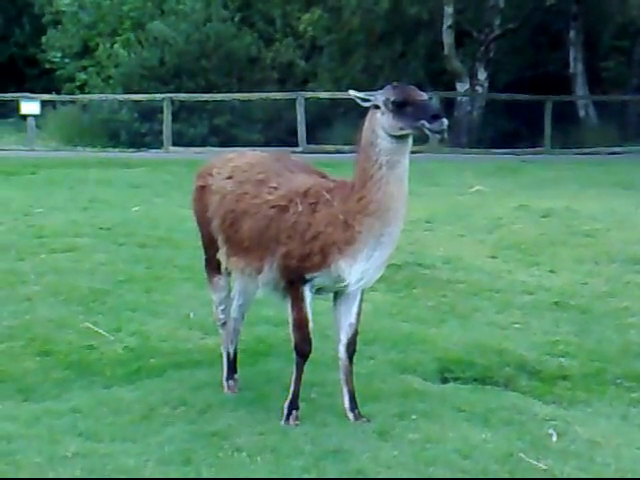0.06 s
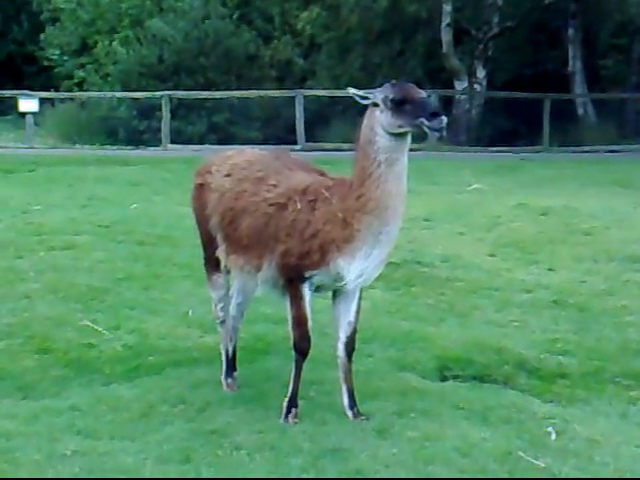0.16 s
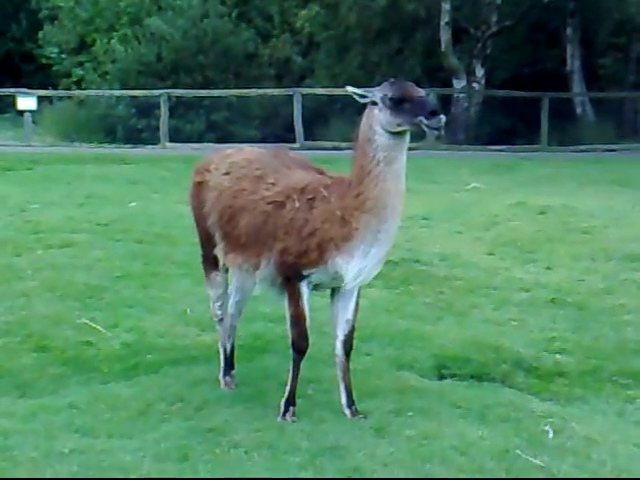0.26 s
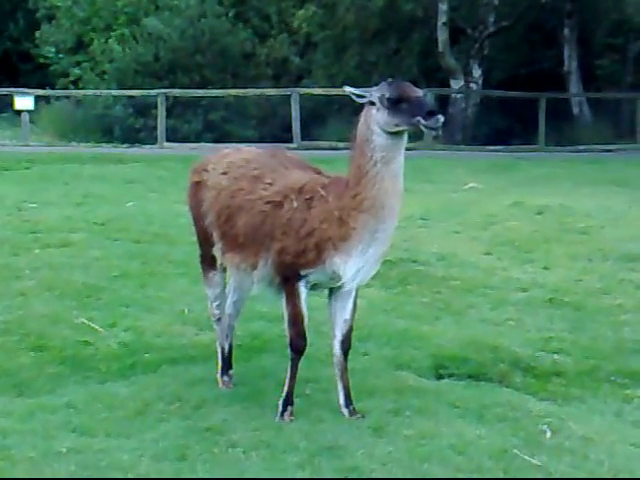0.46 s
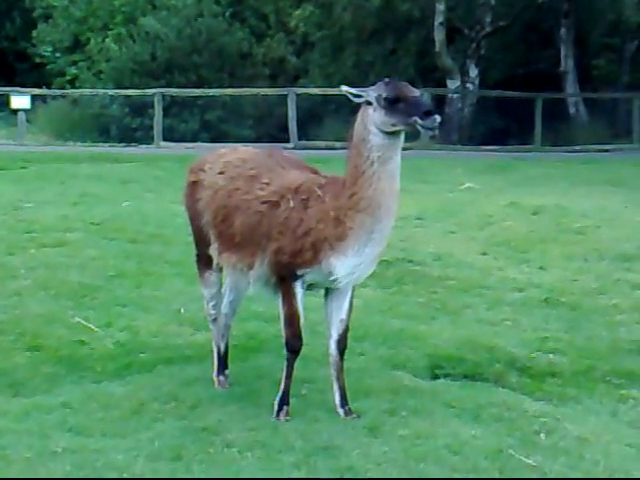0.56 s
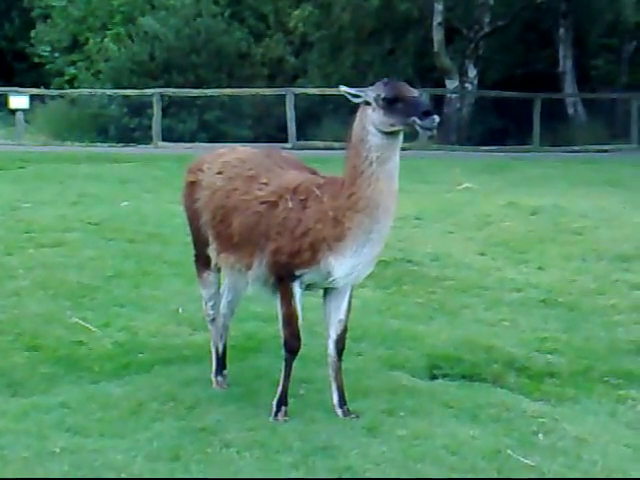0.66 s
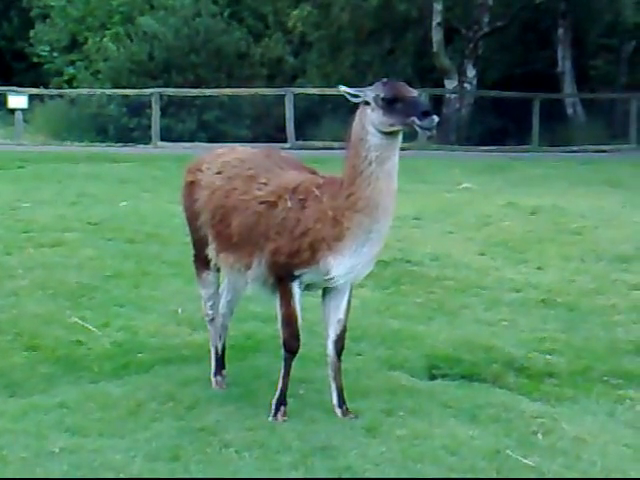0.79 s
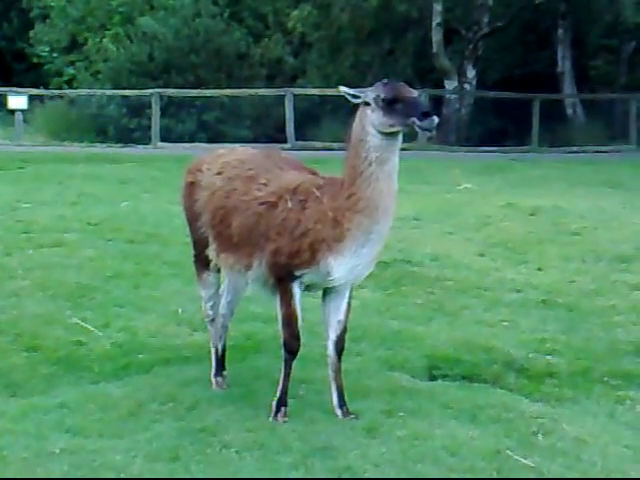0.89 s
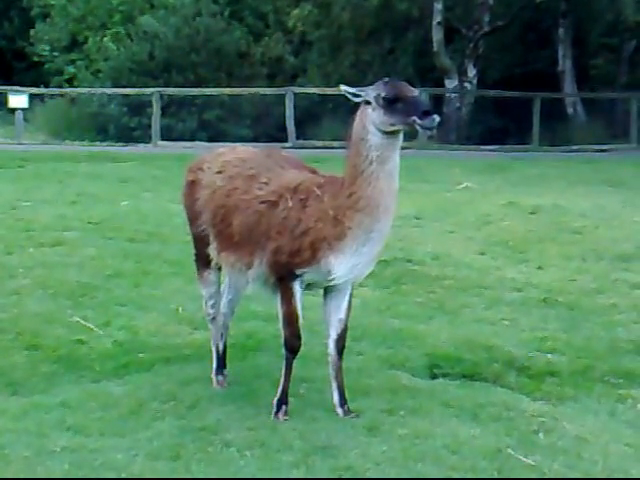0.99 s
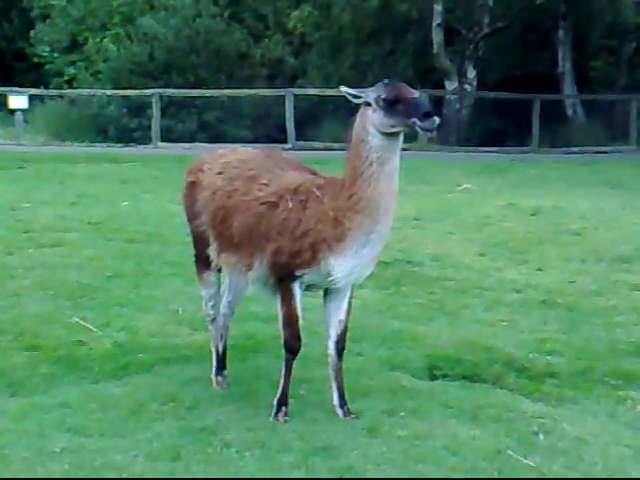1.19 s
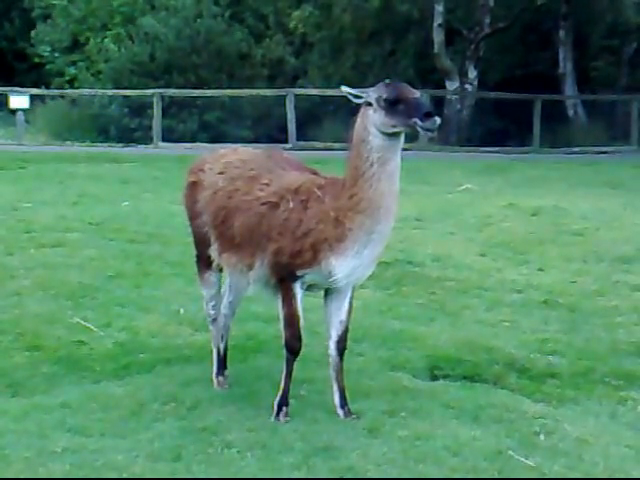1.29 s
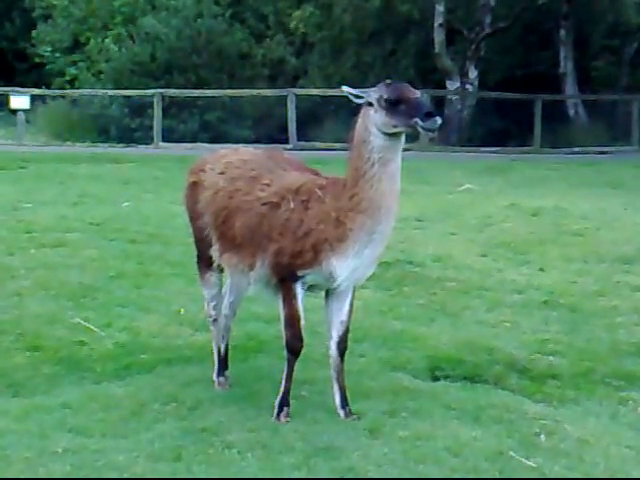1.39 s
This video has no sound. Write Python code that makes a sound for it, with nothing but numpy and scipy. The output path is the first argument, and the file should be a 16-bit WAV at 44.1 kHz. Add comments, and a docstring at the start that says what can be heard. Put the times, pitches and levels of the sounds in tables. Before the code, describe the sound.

A bird, probably a gull, cries five times at an even pace across an open paddock, with a light echo from trees. A fainter bird whistles twice while wind buffets the microphone, once hard near the start.

```python
"""A bird, probably a gull, gives five evenly spaced cries across a paddock. Each cry is a tone with
two overtones that rises and falls in pitch; a short hiccup leads into the last three.
A fainter bird answers with two falling whistles, and the edge of a wood echoes both birds.
Wind buffets the microphone, once hard, and a few small ticks sound over quiet outdoor air."""
import sys
import numpy as np
from scipy import signal
from scipy.fft import rfft, irfft, next_fast_len
from scipy.io import wavfile
from scipy.ndimage import uniform_filter1d, map_coordinates

SR = 44100
rng = np.random.default_rng(int(sys.argv[2]) if len(sys.argv) > 2 else 0)


def generate_wav(signal):
    """Clip the signal to [-1, 1] and save it as 16-bit WAV at the path in sys.argv[1]."""
    frames = np.transpose(np.atleast_2d(signal))
    scaled = np.clip(frames, -1, 1) * 32767
    pcm = np.round(scaled).astype(np.int16)
    wavfile.write(sys.argv[1], SR, pcm)


N = 63945


def amp(db):
    return 10 ** (np.asarray(db) / 20)


def along(points, hz):
    """Read (hz, value) points at any frequency, on a log scale."""
    freqs, values = np.transpose(points)
    return np.interp(np.log(hz + 1), np.log(freqs + 1), values)


def curves(rows, t):
    """Read each column after the time column at times t."""
    times, *columns = np.transpose(rows)
    return [np.interp(t, times, column) for column in columns]


def clock():
    """Sample times, starting half a second early so that echoes are already under way."""
    return np.arange(-(SR // 2), N) / SR


def wobble(rate):
    """A smooth random curve through `rate` points a second."""
    position = (clock() - clock()[0]) * rate
    return map_coordinates(rng.standard_normal(4096), [position], mode="wrap")


def filtered(x, response):
    """Scale each frequency in x by response(hz)."""
    size = next_fast_len(len(x) + 8192)
    return irfft(rfft(x, size) * response(np.fft.rfftfreq(size, 1 / SR)), size)[:len(x)]


def noise(colour):
    """Noise of average power 1; its colour says how strong each frequency is."""
    x = filtered(rng.standard_normal(len(clock())), lambda hz: amp(along(colour, hz)))
    return x / np.sqrt(np.mean(x ** 2) + 1e-20)


def steady(x, span_s):
    """Even out the chance swells of a noise."""
    power = uniform_filter1d(x * x, max(int(span_s * SR), 1))
    return x / np.sqrt(np.abs(power) + 1e-9)


def gate(t, shape, edge=0.0028):
    """Fade in at a shape's first time and out at its last."""
    return np.clip((t - shape[0][0]) / edge, 0, 1) * np.clip((shape[-1][0] - t) / edge, 0, 1)


def phase_of(hz, jitter):
    """Phase of a voice whose pitch trembles by the fraction `jitter`."""
    return 2 * np.pi * np.cumsum(hz * (1 + jitter * wobble(350))) / SR


def notes(shape, rows, jitter, overtone_db):
    """Nearly pure notes that all follow the same slide in pitch."""
    out = 0
    for start, level_db in rows:
        t = clock() - start
        hz, db = curves(shape, t)
        phase = phase_of(hz, jitter)
        tone = np.sin(phase) + amp(overtone_db) * np.sin(2 * phase)
        out = out + gate(t, shape) * amp(level_db + db) * tone
    return out


# The arch that each cry stretches and shifts: time_s, pitch_hz, base_db, octave_db, third_harmonic_db
CRY_ARCH = [(-.012, 895, -36, -80, -89), (-.005, 994, -41, -70.5, -74), (.001, 1254, -39, -42.5, -71.5),
            (.018, 1290, -37.5, -34.5, -69), (0.046, 1318, -38.5, -34, -56),
            (0.084, 1344, -38.5, -37.5, -60.5), (0.099, 1350, -40.5, -36, -54.5),
            (0.113, 1288, -34.5, -28.5, -53.5), (.142, 1221, -31.5, -27, -46),
            (.155, 1133, -30.5, -49.5, -51), (0.166, 917, -42, -65, -83)]
# The cries; the first comes so early that only its echo is heard:
# start_s, pitch_ratio, length_ratio, base_gain_db, octave_gain_db, octave_fade_db, rasp_db
CRY_EVENTS = [(-.3, 0.99, 1, -3, -4, 1, -59), (.013, 1, 1.055, -3, 3.5, 4, -55),
              (.33, .999, 1.03, -3.5, 2.4, 5.5, -64), (.648, .997, 1.025, -2.5, 2, 7.5, -70),
              (.969, .996, .97, 0, 1.5, 6, -54), (1.305, 1.008, 0.97, 1, 0, 11.5, -55.5)]
# Side tones as the voice cracks: pitch_hz, level_db
CRACK_TONES = [(1000, -45), (1770, -41.5), (2070, -74), (3070, -61)]
# Colour of the rasp: frequency_hz, level_db
RASP_COLOUR = [(500, -10.5), (1000, -2), (2000, -2.5), (3100, -8), (4200, -19), (8000, -61)]


def gull_cries():
    """Three harmonics follow one arch; the voice cracks and rasps most as each cry begins."""
    out = 0
    for start, pitch, length, base_db, octave_db, fade_db, rasp_db in CRY_EVENTS:
        t = (clock() - start) / length  # time along the arch
        hz, first, second, third = curves(CRY_ARCH, t)
        phase = phase_of(hz * pitch, jitter=0.0024)
        fall = np.interp(t, [0.11, 0.13], [0, 1])  # the octave fades as the pitch drops
        levels = [first + base_db, second + octave_db - fade_db * fall, third + base_db / 2]
        voice = sum(amp(db + 0.98 * wobble(120)) * np.sin(k * phase) for k, db in enumerate(levels, 1))
        onset = np.clip(1 + t / 0.0088, 0, 1)
        side_tones = sum(amp(db) * np.sin(phase_of(f, jitter=0.012)) for f, db in CRACK_TONES)
        crack = onset * amp(base_db / 2 - 60 * np.abs(t) / 0.13) * side_tones
        burst_db = 10.5 * np.exp(-(t / 0.017) ** 2)
        rasp = onset * amp(rasp_db + burst_db) * noise(RASP_COLOUR)
        out = out + wood_echo(gate(t, CRY_ARCH) * (voice + crack + rasp))
    return out


# How strong the echo is: frequency_hz, level_db
ECHO_COLOUR = [(500, -14), (1300, -3), (2600, -9), (3300, -16), (3900, 1.5), (4600, 6.5), (9000, -11)]
# How long the echo takes to fade by 60 dB: frequency_hz, fade_s
ECHO_FADE = [(500, 0.22), (1300, 0.64), (2600, 0.94), (4000, 1), (9000, .3)]


def wood_echo(call, delay_s=0.028):
    """A call plus the blurred echo that the trees scatter back."""
    hz, t, spectrum = signal.stft(rng.standard_normal(SR), SR, nperseg=256)
    fading_db = along(ECHO_COLOUR, hz)[:, None] - 60 * t / along(ECHO_FADE, hz)[:, None]
    tail = signal.istft(spectrum * amp(fading_db), SR, nperseg=256)[1]
    tail *= np.sqrt(2 * np.log(1000) / SR)  # a one-second fade at 0 dB has energy 1
    tail = np.pad(tail, (int(delay_s * SR), 0))
    return call + signal.fftconvolve(call, tail)[:len(call)]


# Colour of the background: frequency_hz, level_db
AIR_COLOUR = [(40, 7.5), (150, 2), (300, -4.5), (420, 3), (700, -4.5), (1100, -7.5), (1900, -0.5),
              (3000, -13), (4500, -16.5), (7000, -24), (10000, -28), (15500, -27)]
# Its slow drift, used only as a change around the average: time_s, level_db
AIR_DRIFT = [(0.0, -68), (0.332, -68.5), (0.526, -70), (0.896, -70), (1.202, -69), (1.42, -69.5)]


def outdoor_air(level_db=-48):
    """Quiet outdoor noise whose level drifts a little."""
    drift_db, = curves(AIR_DRIFT, clock())
    return amp(level_db + drift_db - drift_db.mean()) * noise(AIR_COLOUR)


# How the wind rises and falls: time_s, rumble_db, flutter_db
WIND_LEVELS = [(0, -38, -46), (.11, -42.5, -57), (.18, -30.5, -37.5), (.245, -32, -27.5),
               (.275, -29, -30.5), (.3, -18.5, -12.5), (.325, -22, -34), (.355, -40, -20), (.4, -22, -45.5),
               (.455, -39, -43.5), (.488, -28.5, -29.5), (.54, -42, -75), (.585, -30, -32.5),
               (.66, -29.5, -42.5), (.75, -44, -71), (.78, -41.5, -61), (.825, -27, -30), (.875, -40, -46),
               (.965, -29, -36.5), (1.04, -33.5, -40.5), (1.075, -28.5, -27.5), (1.125, -29.5, -60),
               (1.19, -27.5, -30), (1.225, -40.5, -80), (1.27, -60, -57), (1.45, -50, -71)]
# Colours of the deep rumble and the higher flutter: frequency_hz, level_db
RUMBLE_COLOUR = [(12, -26), (30, 5), (60, 6.5), (120, 2), (170, -13.5), (300, -23), (600, -92)]
FLUTTER_COLOUR = [(70, -22), (150, 7), (250, -2), (380, -13), (600, -27.5), (1100, -25.5), (3000, -74)]


def wind():
    """Air pushing unevenly on the microphone makes it rumble and flutter."""
    rumble_db, flutter_db = curves(WIND_LEVELS, clock())
    rumble = amp(rumble_db) * steady(noise(RUMBLE_COLOUR), span_s=0.031)
    flutter = amp(flutter_db) * steady(noise(FLUTTER_COLOUR), span_s=0.022)
    return rumble + flutter


# The shape of one whistle: time_s, pitch_hz, level_db
WHISTLE_SHAPE = [(0, 2270, -18.5), (.025, 2450, -0.5), (.052, 2380, -4), (.075, 2049, -6),
                 (.095, 1754, -8.5), (.12, 1421, -18.5)]
# The two whistles: start_s, gain_db
WHISTLE_EVENTS = [(0.03, -34.5), (0.894, -39)]


def whistles():
    """A fainter bird whistles notes that lift briefly, then slide down."""
    return wood_echo(notes(WHISTLE_SHAPE, WHISTLE_EVENTS, jitter=0.012, overtone_db=-28))


# Small swirls of air: time_s, peak_db, width_s
EDDY_EVENTS = [(.235, -12.5, 0.00064), (0.2572, -3.5, 0.0013), (0.339, -26.5, 0.00066), (.58, -22, .0016),
               (0.779, -24.5, 0.0014), (0.817, -19, 0.0014), (.9, -14.5, .0012), (.966, -30, 0.0013),
               (1.06, -16.5, 0.0014), (1.07, -12.5, 0.0019), (1.19, -24, 0.0026)]


def eddies():
    """Each swirl thumps the microphone with one pulse of pressure."""
    out = 0
    for time_s, peak_db, width_s in EDDY_EVENTS:
        offset = (clock() - time_s) / width_s
        out = out + amp(peak_db) * (1 - offset ** 2) * np.exp(-offset ** 2 / 2)
    return out


# Colour of the hard gust: frequency_hz, level_db
GUST_COLOUR = [(60, -23), (170, -2.5), (260, 5), (360, 0), (490, -3), (590, -13.5), (690, -14), (1100, -37),
               (1700, -41.5), (3000, -62), (6000, -84)]


def gust(start_s=0.2587, rise_s=0.01, hold_s=0.023, fall_s=0.022, level_db=-9):
    """One hard gust hits the microphone with a short burst of low noise."""
    corners_s = start_s + np.cumsum([0, rise_s, hold_s, fall_s])
    swell = np.interp(clock(), corners_s, [0, 1, 1, 0])
    return amp(level_db) * swell * steady(noise(GUST_COLOUR), span_s=0.0068)


# The ticks: start_s, level_db, centre_hz
TICK_EVENTS = [(0.5021, -34, 2720), (0.526, -54, 3440), (0.542, -29.5, 1500), (0.563, -48, 2690)]
# Colour of a tick around its centre frequency: frequency_ratio, level_db
TICK_SHAPE = [(.25, 5.5), (1, -4), (1.6, 3), (2.6, -14), (5, -36)]


def ticks(rise_s=0.00088, fade_s=0.016):
    """Small dry ticks nearby, each a burst of noise that dies away at once."""
    out = 0
    for start, level_db, centre_hz in TICK_EVENTS:
        t = clock() - start
        colour = [(centre_hz * ratio, db) for ratio, db in TICK_SHAPE]
        loudness = np.clip(t / rise_s, 0, 1) * amp(level_db - 60 * np.abs(t) / fade_s)
        out = out + loudness * noise(colour)
    return out


# The shape of one hiccup: time_s, pitch_hz, level_db
HICCUP_SHAPE = [(0, 980, -10.5), (.008, 1080, -3.5), (.018, 1228, -9), (.026, 1130, -13), (.036, 956, -24)]
# The three hiccups: start_s, gain_db
HICCUP_EVENTS = [(0.611, -34), (.932, -31.5), (1.27, -31.5)]


def hiccups():
    """The gull's voice gives a short, shaky note just before each of its last three cries."""
    return wood_echo(notes(HICCUP_SHAPE, HICCUP_EVENTS, jitter=0.018, overtone_db=-17))


def scene():
    """Both birds, the wind, the ticks and the outdoor air at one microphone."""
    birds = np.sqrt(2) * (gull_cries() + hiccups() + whistles())  # gives a sine the same power as noise
    mix = birds + wind() + gust() + eddies() + ticks() + outdoor_air()
    return mix[None, -N:]  # drop the early half second


def record(dry, overload=0.76, top_hz=15750):
    """The microphone rounds off the hardest gust's peaks and passes nothing above top_hz."""
    rounded = dry[0] / (1 + np.abs(dry[0] / overload) ** 6) ** (1 / 6)
    return filtered(rounded, lambda hz: hz < top_hz)[None]


dry = scene()
out = record(dry)
generate_wav(out)
```